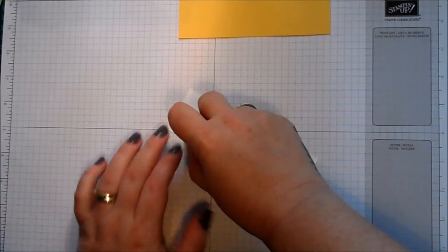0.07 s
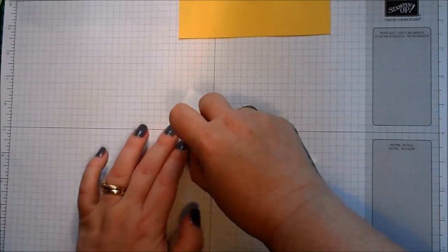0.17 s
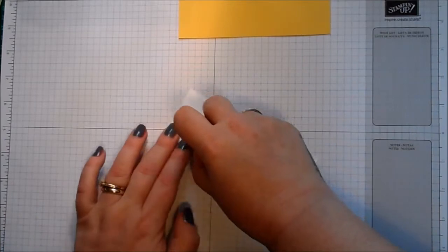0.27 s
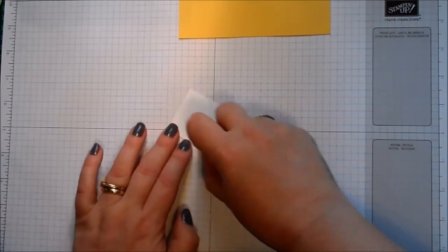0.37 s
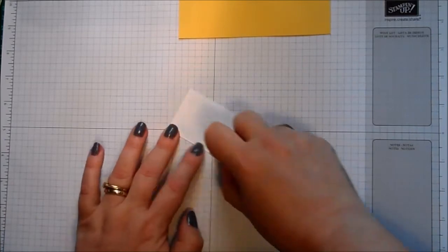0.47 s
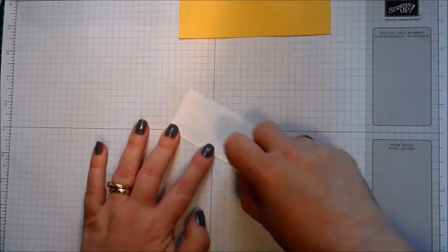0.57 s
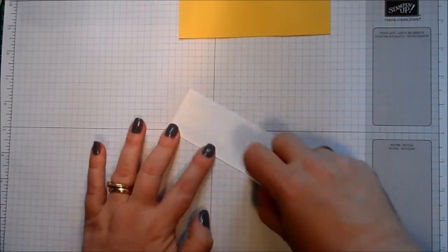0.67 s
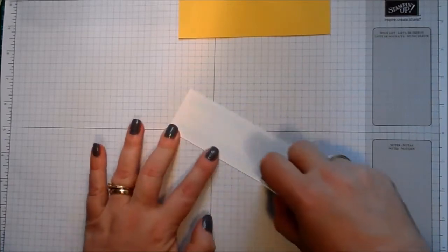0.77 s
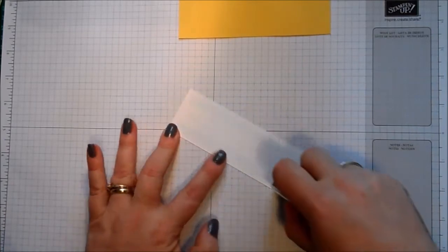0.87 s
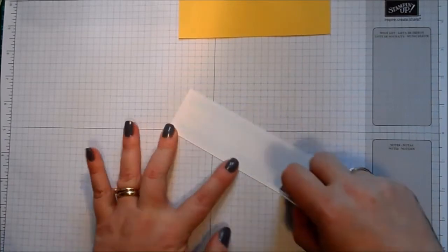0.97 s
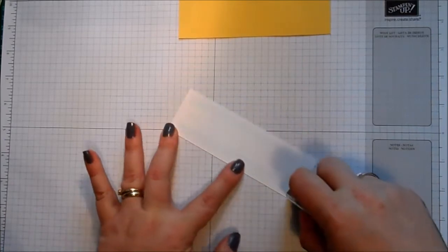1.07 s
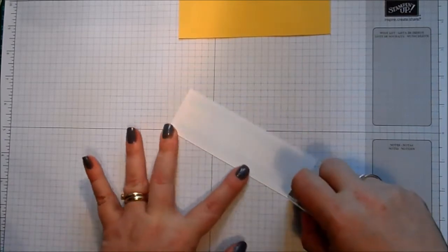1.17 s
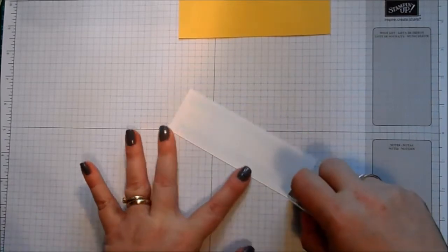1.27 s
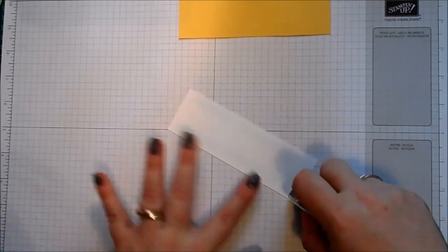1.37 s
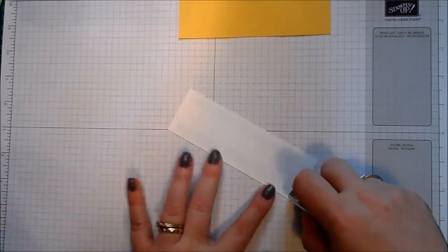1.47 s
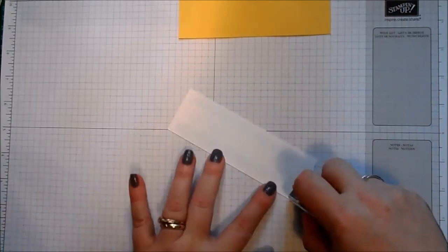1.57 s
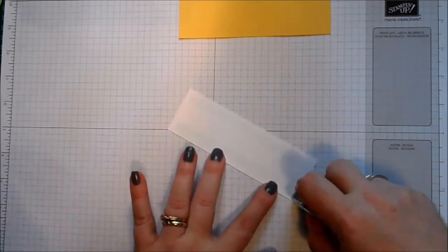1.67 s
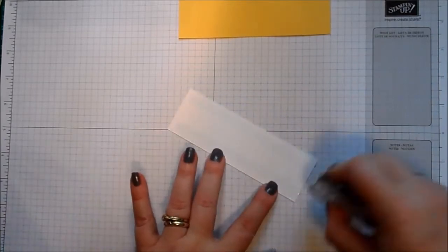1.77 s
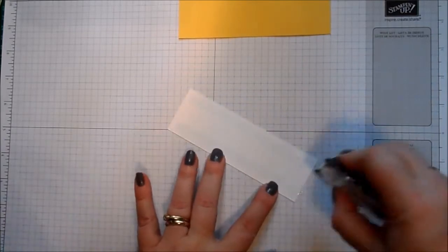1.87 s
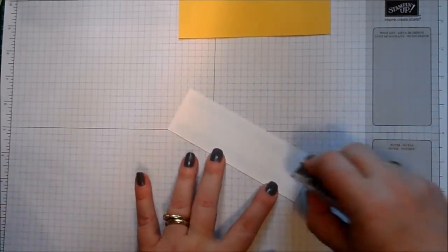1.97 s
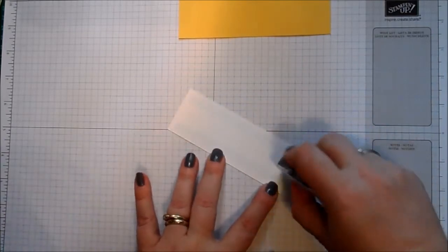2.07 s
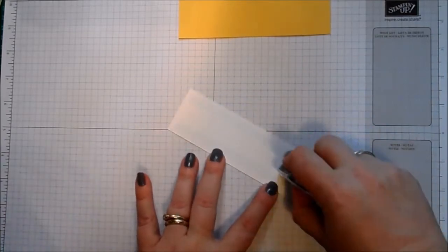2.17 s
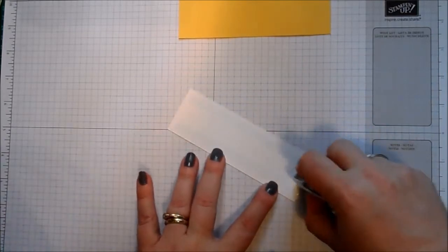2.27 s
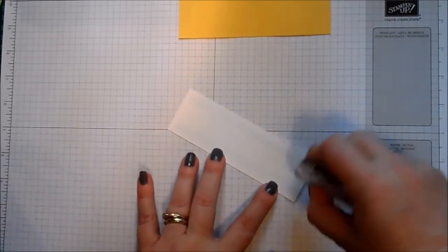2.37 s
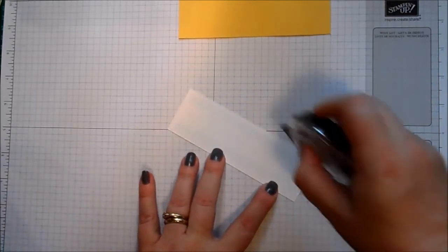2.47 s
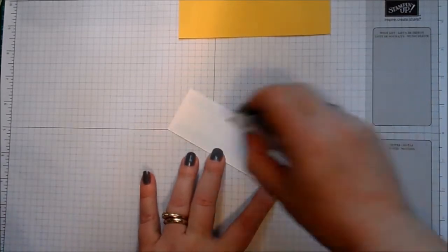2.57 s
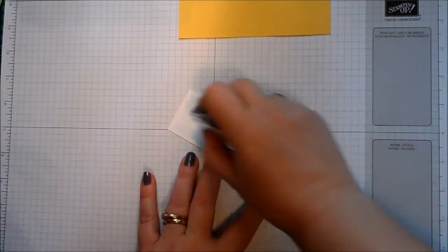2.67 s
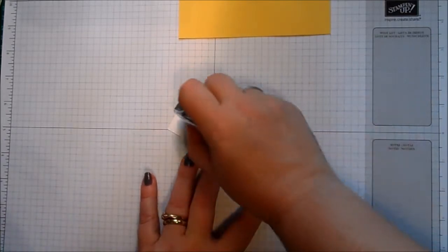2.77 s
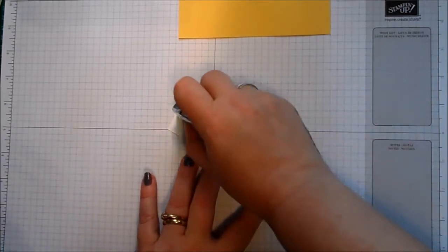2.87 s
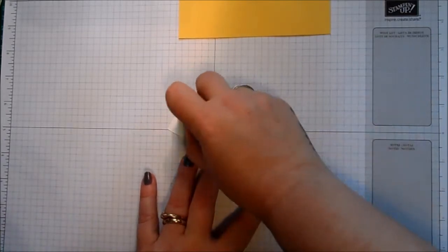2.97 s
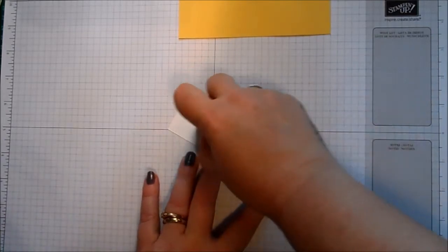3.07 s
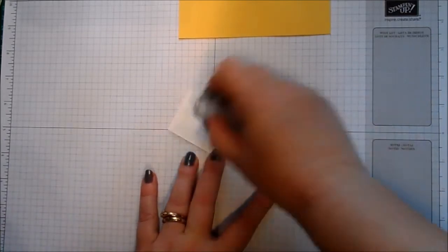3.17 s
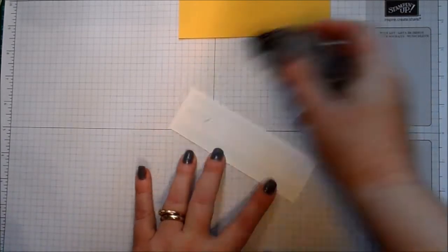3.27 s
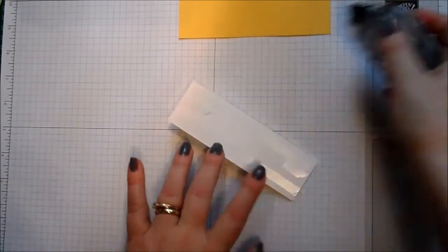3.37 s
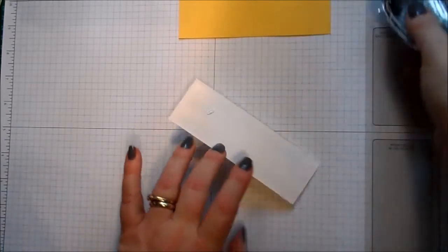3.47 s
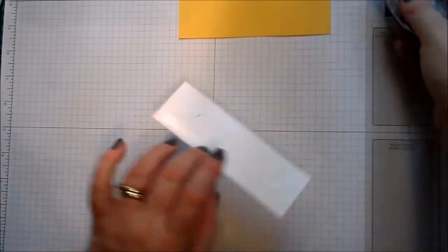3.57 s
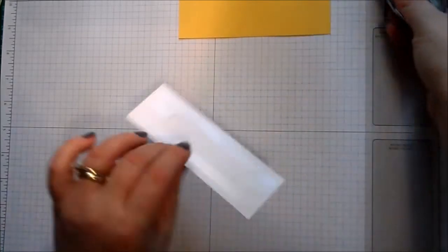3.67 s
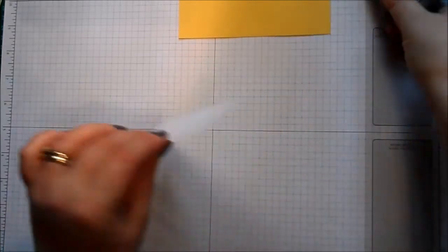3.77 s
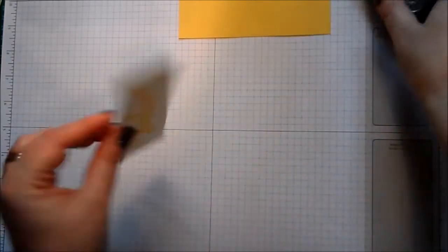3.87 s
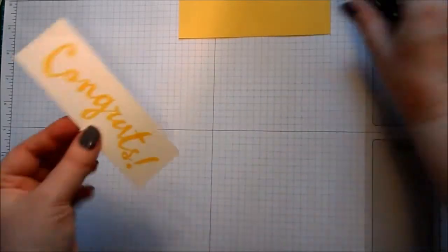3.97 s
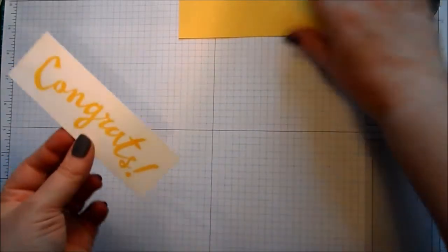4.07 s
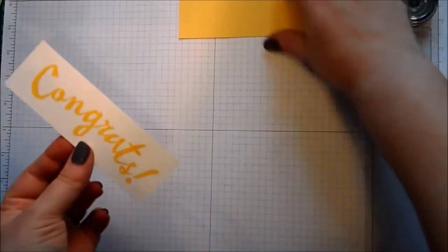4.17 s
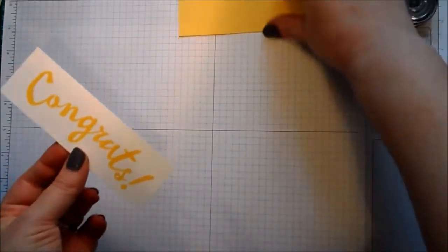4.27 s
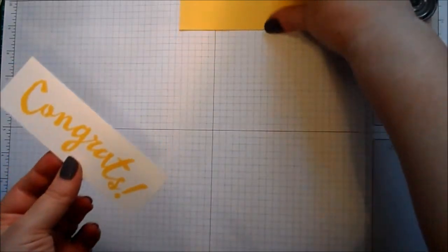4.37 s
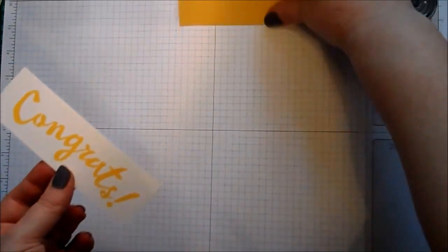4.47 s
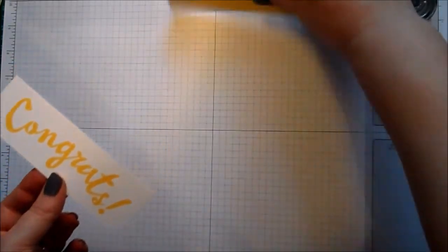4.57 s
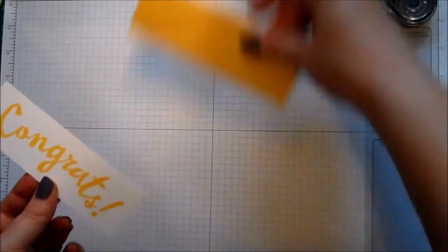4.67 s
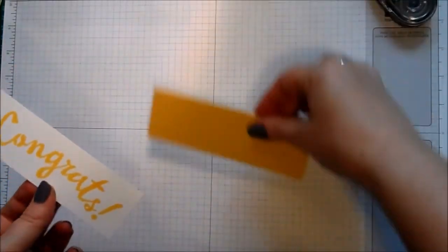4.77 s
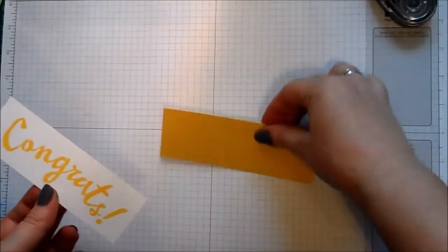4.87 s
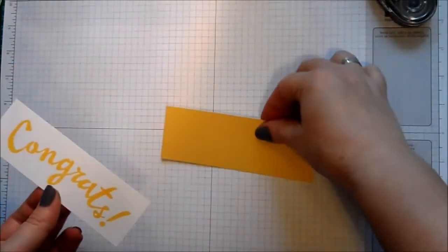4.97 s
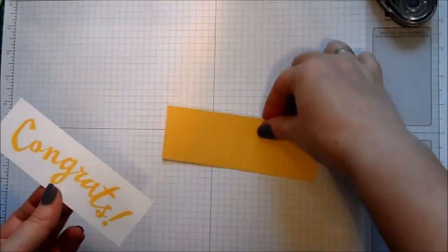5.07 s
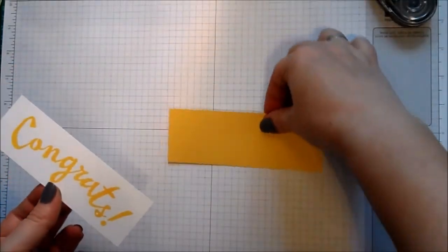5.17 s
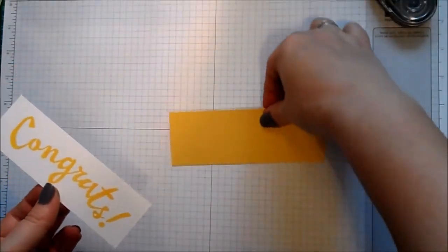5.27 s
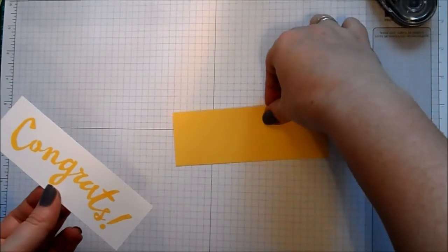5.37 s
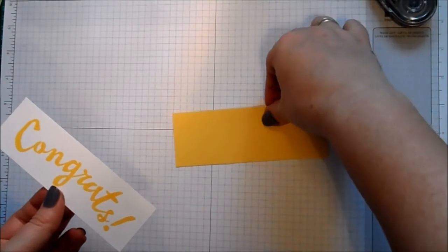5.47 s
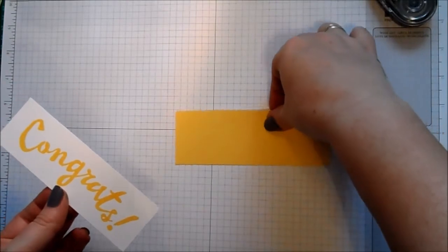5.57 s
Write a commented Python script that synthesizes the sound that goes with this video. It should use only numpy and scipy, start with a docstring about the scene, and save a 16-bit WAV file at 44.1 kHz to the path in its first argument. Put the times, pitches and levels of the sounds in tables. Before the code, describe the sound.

A close microphone in a small quiet room, with faint low rumble, hiss and a barely noticeable thin whine. A light plastic knock comes at the very start. From about 0.4 to 1.25 s a tape runner is pulled along paper: a rapid, dry plastic ratchet, speeding up and then slowing, mixed with sticky crackle and a bright fizzing spool that sharpens at the stop. A faint click at 1.4 s and a tight group of plastic clicks around 1.8 s follow. A thuddy tap at 2.25 s leads into a short zip at 2.3-2.47 s, then a tap at 2.5. More knocks near 3.0-3.1 s precede another very brief zip ending by 3.26, with a tap at 3.4. At 3.85-4.25 s the runner is put down in a loud, uneven, hollow clatter. Card then scrapes briefly at 4.6 s and slides with a fluttering, growing papery hiss from 4.9 to 5.45 s, amid soft hand rubbing.

```python
"""A light plastic knock opens the scene over faint room noise, then an adhesive tape runner is drawn along paper.
One long and two short strokes follow: pawl impacts excite the case, released glue grains crackle, the spool ticks.
Further knocks surround them; the runner is put down with a clatter of struck case and table modes.
Last, card slides over the mat as flickering grain noise. A small quiet room adds a short reverberant tail."""
import sys
import numpy as np
from scipy import signal
from scipy.fft import rfft, irfft
from scipy.io import wavfile
from scipy.ndimage import uniform_filter1d

SR = 44100
rng = np.random.default_rng(int(sys.argv[2]) if len(sys.argv) > 2 else 0)


def wrap_up_sound(samples):
    """Save the sound to the file named by the first command line argument, as 16-bit audio."""
    columns = np.atleast_2d(samples).T
    # keep every value between -1 and 1, then stretch to whole-number steps
    tamed = np.clip(columns, -1, 1)
    steps = np.round(tamed * 32767).astype(np.int16)
    wavfile.write(sys.argv[1], SR, steps)


N = 248679
TIME = np.arange(N) / SR
AGE = TIME[:SR // 4]  # time since a contact, s


def undb(db):
    """Level definition: decibels to amplitude gain."""
    return 10 ** (np.asarray(db) / 20)


def unit(x):
    """Normalisation: scale to unit energy."""
    return x / np.sqrt(np.sum(x ** 2))


def swell(curve):
    """Amplitude modulation: gain along a (t/s, level/dB) curve, 1 outside it."""
    s, db = np.transpose(curve)
    return undb(np.interp(TIME, s, db, left=0, right=0))


def add(out, s, sound):
    """Superposition: mix a sound in at a given time."""
    start = max(int(s * SR), 0)
    out[start:start + len(sound)] += sound[:N - start]


def through(x, response):
    """Linear filtering: convolve a sound with an impulse response."""
    return signal.fftconvolve(x, response)[:len(x)]


def colour(points, tilt_db=0, size=1024):
    """Minimum phase: causal response of a (f/Hz, level/dB) spectrum, tilted in dB an octave."""
    hz, db = np.transpose(points)
    octave = np.log2(np.maximum(np.fft.rfftfreq(size, 1 / SR), 10))
    level = np.interp(octave, np.log2(hz), db + tilt_db * np.log2(hz))
    cepstrum = irfft(np.log(undb(level)))
    # folding the cepstrum onto positive time makes the response causal
    cepstrum[1:size // 2] *= 2
    cepstrum[size // 2 + 1:] = 0
    return unit(irfft(np.exp(rfft(cepstrum))))


def noise(points):
    """Spectral shaping: white noise filtered to a given colour, nominal rms 1."""
    return through(rng.standard_normal(N), colour(points, size=8192))


def fade(t60):
    """Exponential damping: the level falls 60 dB in t60 seconds."""
    return np.exp(-np.log(1000) * AGE / t60)


def burst(t60):
    """Broadband impact: a decaying random crackle with its energy spread evenly over frequency."""
    spectrum = rfft(rng.standard_normal(len(AGE)) * fade(t60))
    local = np.sqrt(uniform_filter1d(np.abs(spectrum) ** 2, size=150))
    return unit(irfft(spectrum / local, len(AGE)) * (AGE < t60))


MODE_SCATTER_DB = 4  # range of the uniform scatter


def ring(modes, tilt_db=0):
    """Modal superposition: neighbours alternate in sign; each blow lands elsewhere and weights them anew."""
    hz, db, t60 = np.transpose(modes)[:, :, None]
    db = db + MODE_SCATTER_DB * rng.random(hz.shape) + tilt_db * np.log2(hz)
    sign = np.cos(np.pi * np.arange(len(modes)))[:, None]
    partials = sign * undb(db) * fade(t60) * np.sin(2 * np.pi * hz * AGE)
    return unit(np.sum(partials, axis=0))


def grains(rate, scatter_db):
    """Random impulse process: tiny snaps of uneven size, on average rate a second; rms 1."""
    snaps = rng.random(N) < rate / SR
    size = rng.choice([-1, 1], N) * undb(scatter_db * rng.uniform(-1.7, 1, N))
    return unit(snaps * size) * np.sqrt(N)


# spectrum of the room's rumble and hiss: f/Hz, relative level/dB
ROOM_COLOUR = [(12, -40), (20, 2.5), (70, -5), (157, -6.5), (202, -12), (232, -8), (306, -13), (519, -12),
               (631, -13), (767, -12.5), (1820, -20.5), (3000, -20), (9390, -30), (12100, -25.5),
               (15500, -32)]
# steady tones of the equipment: f/Hz, rms level/dB
TONES = [(167, -80), (11725, -81), (14675, -90)]


def background(noise_db=-61.5):
    """Stationary noise and pure tones: room rumble and hiss, a faint hum and a thin electronic whine."""
    tones = sum(np.sqrt(2) * undb(db) * np.sin(2 * np.pi * hz * TIME) for hz, db in TONES)
    return undb(noise_db) * noise(ROOM_COLOUR) + tones


def room(x, wet_db=-9, t60=0.14, treble_t60=0.093, split_hz=4500, first_s=0.0069):
    """Reverberation: the direct sound and a short diffuse tail whose treble dies first."""
    scatter = rng.standard_normal(len(AGE))
    low = signal.sosfilt(signal.butter(1, split_hz, fs=SR, output="sos"), scatter)
    high = scatter - low
    tail = (low * fade(t60) + 0.85 * high * fade(treble_t60)) * (AGE > first_s)
    return x + undb(wet_db) * through(x, unit(tail))


FLUTTER_PER_S, FLUTTER_DB = 30, 2.2  # random steps a second, their standard deviation


def flutter():
    """Stick-slip modulation: the fibres catch and let go, so the gain wanders quickly at random."""
    steps = rng.standard_normal(int(TIME[-1] * FLUTTER_PER_S) + 2)
    return undb(FLUTTER_DB * np.interp(TIME * FLUTTER_PER_S, np.arange(len(steps)), steps))


CARD_ATTACK_S, CARD_RELEASE_S = 0.026, 0.0096
# spectra of the card's friction and of dull rubbing: f/Hz, relative level/dB
CARD_COLOUR = [(530, -53), (900, -11), (1180, -16.5), (2000, -0.5), (2390, -6.5), (2790, 2), (3780, -7),
               (5990, -9.5), (8630, -15.5), (15000, -21)]
RUB_COLOUR = [(120, -34.5), (250, -3), (320, 2), (430, -3), (600, -9.5), (1200, -15.5), (3000, -26)]
# the runner skids, then the card is dragged over the mat:
# start t/s, length t/s, relative starting level/dB, growth level/dB
SLIDES = [(3.952, 0.08, -59.5, 4), (4.569, 0.12, -59, 10.5), (4.918, 0.525, -64.5, 5.5)]
# a hand brushes the mat, swelling and fading: height t/s, half length t/s, relative level/dB
BRUSHES = [(0.334, 0.2, -58), (1.057, 0.13, -55.5), (3.024, 0.29, -61), (4.438, 0.24, -68.5),
           (5.09, 0.33, -58.5)]


def sliding(card_db=-1, rub_db=-3):
    """Dry friction: card fibres catch on the mat in tiny grains; the hands add a dull rub."""
    hiss = through(grains(6000, scatter_db=5), colour(CARD_COLOUR))
    drag = 0
    for s, length, db, growth_db in SLIDES:
        before = np.minimum(TIME - s, 0)
        after = np.maximum(TIME - s - length, 0)
        edges = np.exp(before / CARD_ATTACK_S - after / CARD_RELEASE_S)
        drag = drag + edges * undb(db + growth_db * np.clip((TIME - s) / length, 0, 1))
    brush = sum(undb(db) * np.exp(-((TIME - s) / half) ** 2) for s, half, db in BRUSHES)
    return undb(card_db) * drag * flutter() * hiss + undb(rub_db) * brush * noise(RUB_COLOUR)


TABLE_LOWEST_HZ = 130
# natural modes of the table: f/Hz, relative level/dB, t60 before further damping t/s
TABLE_MODES = [(153, 1, 0.063), (170, 6.5, 0.24), (300.5, -4, 0.21), (443, 6, 0.044), (477, -0.5, 0.16),
               (511, -3.5, 0.14), (660, 8, 0.036), (748, 3.5, 0.077)]


def table_ring(t60, tilt_db):
    """Damped modes: whatever rests on the table damps it further; the top radiates no deep bass."""
    radiation = signal.butter(4, TABLE_LOWEST_HZ, "highpass", fs=SR, output="sos")
    return unit(signal.sosfilt(radiation, ring(TABLE_MODES, tilt_db=tilt_db) * fade(t60)))


def blow(points, bright_db, t60, rise_s):
    """Elastic impact: the plastic case flexes for a moment, then the contact dies away."""
    contact = burst(t60) * (1 - np.exp(-AGE / rise_s))
    return unit(through(contact, colour(points, bright_db)))


# modes of the hand-held case: f/Hz, relative level/dB, t60 t/s
CASE_MODES = [(1330, -3, 0.069), (1524, 6, 0.091), (1493, 5.5, 0.017), (1740, 6, 0.076), (1750, -24, 0.16),
              (2090, -14, 0.28), (1888, -2.5, 0.26), (2234, -1, 0.14), (2810, 6.5, 0.032), (2850, 1, 0.029),
              (3650, -16, 0.13), (3820, -17, 0.18), (4110, 2, 0.091), (5280, 2, 0.054)]
# spectra of light knocks, sharp snaps and the pressing hand: f/Hz, relative level/dB
TAP_COLOUR = [(240, -52), (400, -22), (1020, -4.5), (1210, -3), (1470, 6), (1820, -9), (2740, -2),
              (3550, -13.5), (4460, -10.5), (7930, -26), (15000, -34)]
SNAP_COLOUR = [(2000, -19), (5000, -3.5), (7500, -1), (11000, -8), (15500, -10.5)]
PRESS_COLOUR = [(25, 11), (70, 5.5), (130, 5), (300, 11), (1000, -60)]
# the runner touches down, lifts off or shifts in the hand:
# t/s, relative levels of case, table thud and snap level/dB, brightness/(dB an octave)
TAPS = [(0.002, -31, -66, -71, 4.5), (0.328, -39.5, -72, -57, 9), (1.413, -48, -69, -52, 6.5),
        (1.779, -26.5, -68, -43.5, 0.5), (1.782, -25.5, -66, -51, 3), (1.806, -22.5, -65, -47, -0.5),
        (1.82, -22.5, -63, -58, 3), (2.253, -29.5, -40.5, -53, -4), (2.257, -26, -57, -68, 0),
        (2.508, -38.5, -71, -57, 2.5), (3.007, -32.5, -58, -63, -2.5), (3.023, -39, -65, -69, -3.5),
        (3.092, -31, -65, -72, -0.5), (3.104, -33, -59, -52, 5), (3.378, -29, -62, -63, 5.5),
        (3.653, -51, -63, -51.5, 6), (4.493, -40.5, -62.5, -74, -1), (4.727, -42, -74, -60.5, -3)]


def taps(case_db=14, thud_db=26, snap_db=24, ring_db=-6, contact_t60=0.027, snap_t60=0.014,
         press_db=-7, halving_db=6):
    """Damped impact: a snap, the ring of the held case, and a table thud damped by the pressing hand."""
    out = np.zeros(N)
    for s, db, thud, snap, bright_db in TAPS:
        # a harder, brighter contact is shorter and rings the case less
        t60 = contact_t60 / 2 ** (bright_db / halving_db)
        knock = blow(TAP_COLOUR, bright_db, t60, rise_s=0.0016)
        shell = knock + undb(ring_db - bright_db) * ring(CASE_MODES, tilt_db=bright_db - 6.5)
        table = unit(through(table_ring(t60=0.35, tilt_db=1.5), colour(RUB_COLOUR)))
        press = through(burst(0.048), colour(PRESS_COLOUR, size=4096))
        table = table + undb(press_db) * press
        edge = through(burst(snap_t60), colour(SNAP_COLOUR))
        sound = undb(db + case_db) * unit(shell)
        sound = sound + undb(thud + thud_db) * table + undb(snap + snap_db) * edge
        add(out, s, sound)
    return out


TICK_T60 = .004  # s, shared by bounces and spool ticks
BOUNCE_COUNT, BOUNCE_GAP_S = 4, .021  # the gap is the mean
FIRST_BOUNCE_DB, BOUNCE_LOSS_DB = -20, 2.5


def bounces(sound):
    """Repeated impact: after a knock the loose parts bounce at uneven intervals, ever weaker."""
    out, s = np.zeros(N), 0
    add(out, s, sound)
    for k in range(BOUNCE_COUNT):
        s += BOUNCE_GAP_S * rng.uniform(.5, 1.5)
        add(out, s, undb(FIRST_BOUNCE_DB - k * BOUNCE_LOSS_DB) * through(sound, burst(TICK_T60)))
    return out[:len(sound)]


# modes of the case lying on the table: f/Hz, relative level/dB, t60 t/s
RESTING_MODES = [(1014, 2, 0.13), (1230, -3, 0.26), (1355, 2, 0.1), (1420, -3, 0.14), (1459, 8.5, 0.085),
                 (1650, -4, 0.18), (1740, 0, 0.063), (1710, -2, 0.13), (1965, 15, 0.037),
                 (2530, 2.5, 0.094), (2786, 6, 0.087), (2936, 7, 0.05), (4560, -13, 0.27)]
# spectrum of the landing contacts: f/Hz, relative level/dB
CLATTER_COLOUR = [(40, -63), (150, -23), (300, -14), (450, -14), (800, -15), (1020, -5), (1250, -4.5),
                  (1670, 2.5), (2200, -12), (2780, 1.5), (3200, -12), (4300, -8), (6000, -23.5),
                  (15000, -34)]
# the runner is put down and rocks:
# t/s, relative levels of case, table thud and snap level/dB, brightness/(dB an octave)
CLATTER = [(3.852, -13.5, -37, -39, 1.5), (3.888, -18.5, -48, -44.5, -0.5), (3.939, -33, -50, -72, -1.5),
           (4.046, -23.5, -49, -54, 3.5), (4.053, -29, -42.5, -50, 2), (4.06, -14.5, -34.5, -43, 1.5),
           (4.069, -17.5, -53, -42, -2.5), (4.106, -28, -58, -34.5, 0), (4.111, -25.5, -62, -50, -7),
           (4.122, -13.5, -66, -53, -2.5), (4.129, -25, -45.5, -59, 2), (4.2, -33.5, -56, -55, -1.5),
           (4.24, -38, -61, -63, -7.5)]


def clatter(case_db=13, thud_db=27, snap_db=20, ring_db=-4, contact_t60=0.024, snap_t60=0.12):
    """Free vibration: the runner lands on one edge, then rocks flat; let go, case and table ring freely."""
    out = np.zeros(N)
    for s, db, thud, snap, bright_db in CLATTER:
        knock = blow(CLATTER_COLOUR, bright_db, contact_t60, rise_s=0.00062)
        shell = knock + undb(ring_db) * ring(RESTING_MODES, tilt_db=bright_db)
        edge = through(burst(snap_t60), colour(SNAP_COLOUR))
        sound = undb(db + case_db) * bounces(unit(shell))
        sound = sound + undb(thud + thud_db) * table_ring(t60=1.0, tilt_db=-0.5)
        sound = sound + undb(snap + snap_db) * edge
        add(out, s, sound)
    return out


def hand_speed(curve):
    """Kinematics: ratchet teeth a second at every moment; the hand rests outside the stroke."""
    s, rate = np.transpose(curve)
    return np.interp(TIME, s, rate, left=0, right=0)


def passing(speed, per_tooth):
    """Phase accumulation: 1 wherever the wheel has turned one step further, from the moment it starts."""
    return np.diff(np.ceil(np.cumsum(speed) * per_tooth / SR), prepend=0)


USUAL_TEETH_PER_S = 58  # speed at which by_speed gives gain 1


def by_speed(speed, doubling_db):
    """Power law: gain that changes by so many dB when the speed doubles; silent at rest."""
    return undb(doubling_db * np.log2(np.maximum(speed, 10) / USUAL_TEETH_PER_S)) * (speed > 0)


TICK_SCATTER_DB = 1.5


def spool(speed, ticks_per_tooth=7.6, slow_rate=22):
    """Geared impulses: the spool ticks several times a ratchet tooth, following the hand's speed."""
    # sparser ticks are larger, down to the slow rate in teeth a second
    spacing = np.sqrt(SR / (ticks_per_tooth * np.maximum(speed, slow_rate)))
    size = undb(TICK_SCATTER_DB * rng.standard_normal(N)) * spacing
    return through(passing(speed, ticks_per_tooth) * size, burst(TICK_T60))


# a faster hand tears more glue
SIZZLE_DB_PER_DOUBLING, CRACKLE_DB_PER_DOUBLING = 3.5, 8.5
# the tape pulls tight as the hand stops, and the spool ticks louder and brighter
TIGHTEN_S, TIGHTEN_DB = 0.13, 9.5
HISS_DB, GRAIN_RATE = -7, 700  # relative hiss level, mean glue grains a second
# spectrum of the spool's sizzle: f/Hz, relative level/dB
SIZZLE_COLOUR = [(1000, -13), (3000, -14), (6000, 9.5), (8500, 2.5), (11000, 4), (12800, 3.5),
                 (15000, -5.5)]
# spectrum of the case shaken by ratchet or glue: f/Hz, relative level/dB
RATCHET_COLOUR = [(100, -58), (250, -42), (305, -46), (350, -31), (700, -21), (1000, -12.5), (1450, 2),
                  (2050, -3), (2450, -5.5), (3100, -6.5), (5100, -10), (6300, -14.5), (9000, -20.5),
                  (15000, -22.5)]
# how hard the hand bears down along the strokes: t/s, level/dB
PRESSURE = [(0.37, 1), (0.48, 2.5), (0.67, -0.5), (0.76, -1.5), (0.9, 1.5), (1.02, 0.5), (1.07, -3),
            (1.16, 2), (1.21, -2.5), (2.31, -1.5), (2.38, 0.5), (2.45, -0.5), (3.12, -5), (3.18, 2),
            (3.25, -2)]


def tape(speed, sizzle_db, crackle_db, span_hz, span_width, span_db, glue_db=-12, tight_tilt_db=9):
    """Stick-slip peeling: glue grains shake the case and the taut tape; spool ticks and sizzle lie on top."""
    ticks = spool(speed)
    stop_s = TIME[speed > 0][-1]
    tight = np.clip(1 - (stop_s - TIME) / TIGHTEN_S, 0, 1)
    top = through(ticks + undb(HISS_DB) * rng.standard_normal(N), colour(SIZZLE_COLOUR))
    bright_ticks = through(ticks, colour(SIZZLE_COLOUR, tight_tilt_db))
    top = top + undb(TIGHTEN_DB) * tight ** 2 * bright_ticks
    # the bandwidth of a resonance sets its decay
    taut = unit(np.exp(-np.pi * span_width * AGE) * np.cos(2 * np.pi * span_hz * AGE))
    glue = through(grains(GRAIN_RATE, scatter_db=8), burst(0.0054))
    span = through(grains(GRAIN_RATE, scatter_db=7.0), taut)
    rip = through(glue, colour(RATCHET_COLOUR)) + undb(span_db) * span
    sizzle = undb(sizzle_db) * by_speed(speed, SIZZLE_DB_PER_DOUBLING) * top
    tearing = by_speed(speed, CRACKLE_DB_PER_DOUBLING) * swell(PRESSURE)
    return sizzle + undb(crackle_db + glue_db) * tearing * rip


TOOTH_DB_PER_DOUBLING = -1.03  # a faster hand softens the teeth
TOOTH_SCATTER_DB, TOOTH_COLOUR_DB = 1.4, 2.5  # standard deviations of level and colour points
GRIP_DETUNE = .02  # the grip shifts the case's modes from tooth to tooth: scale as a share of their pitch
BUZZ_DB = -10


def ratchet(speed, tooth_db, gain_db=-29.5, contact_t60=0.016, rebound_s=.0026, rebound_db=0, ring_db=-5,
            buzz_t60=0.22, rise_s=0.0017, tilt_spread_db=0.74, table_db=-28):
    """Impact excitation: the pawl slips onto the next tooth; case rings, loose parts buzz, table hums along."""
    out = np.zeros(N)
    force = swell(PRESSURE) * by_speed(speed, TOOTH_DB_PER_DOUBLING)
    for i in np.flatnonzero(passing(speed, 1)):
        landing = np.interp(AGE - rebound_s, AGE, burst(contact_t60), left=0)
        contact = burst(contact_t60) + undb(rebound_db) * unit(landing)
        contact = contact + undb(BUZZ_DB) * burst(buzz_t60)
        contact = contact * (1 - np.exp(-AGE / rise_s))
        # every tooth has a colour of its own
        hz, colour_db = np.transpose(RATCHET_COLOUR)
        tooth = np.c_[hz, colour_db + TOOTH_COLOUR_DB * rng.standard_normal(len(hz))]
        shell = colour(tooth, tilt_spread_db * rng.standard_normal())
        hum = unit(through(table_ring(t60=1.0, tilt_db=3), colour(RUB_COLOUR)))
        gripped = np.array(CASE_MODES) * [1 + GRIP_DETUNE * rng.uniform(-1.91, 1), 1, 1]
        click = unit(through(contact, shell)) + undb(ring_db) * ring(gripped, tilt_db=1.0)
        click = click + undb(table_db) * hum
        level = undb(tooth_db + TOOTH_SCATTER_DB * rng.standard_normal())
        add(out, i / SR, unit(click) * force[i] * level * rng.choice([-1, 1]))
    return out * undb(gain_db) * np.sqrt(len(AGE))


def stroke(curve, tooth_db, *tape_sound):
    """Common drive: in one pull of the runner the hand's speed drives ratchet and tape together."""
    speed = hand_speed(curve)
    return ratchet(speed, tooth_db) + tape(speed, *tape_sound)


# speed of the hand, one curve a stroke: t/s, rate/(ratchet teeth a second)
LONG_SPEED = [(0.367, 8.693), (0.408, 38.72), (0.536, 64.656), (0.737, 77.992), (0.797, 42.783),
              (0.818, 78.035), (0.894, 52.932), (1.098, 29.186), (1.173, 29.392), (1.25, 0.0)]
SECOND_SPEED = [(2.31, 60.549), (2.366, 96.205), (2.427, 44.441), (2.47, 0.0)]
THIRD_SPEED = [(3.122, 30.24), (3.136, 111.929), (3.234, 50.71), (3.26, 0.0)]
# one row a stroke: relative levels of teeth, sizzle and crackle level/dB,
# resonance of the taut tape f/Hz, its width f/Hz, its relative level/dB
STROKES = [(-21.5, -55, -34, 4200, 960, -10), (-21.5, -55, -34, 5000, 1100, -4.5),
           (-23.5, -68, -35.5, 3980, 630, 3.5)]


def scene():
    """Superposition: three strokes, handling and card sound reverberate together over the background."""
    speeds = (LONG_SPEED, SECOND_SPEED, THIRD_SPEED)
    runner = sum(stroke(curve, *row) for curve, row in zip(speeds, STROKES))
    return (room(runner + taps() + clatter() + sliding()) + background())[None]


TOP_HZ = 16100


def record(dry):
    """Band limitation: a steep elliptic low-pass cuts the top."""
    return signal.sosfilt(signal.ellip(10, .2, 70, TOP_HZ, fs=SR, output="sos"), dry)


dry = scene()
out = record(dry)
wrap_up_sound(out)
```